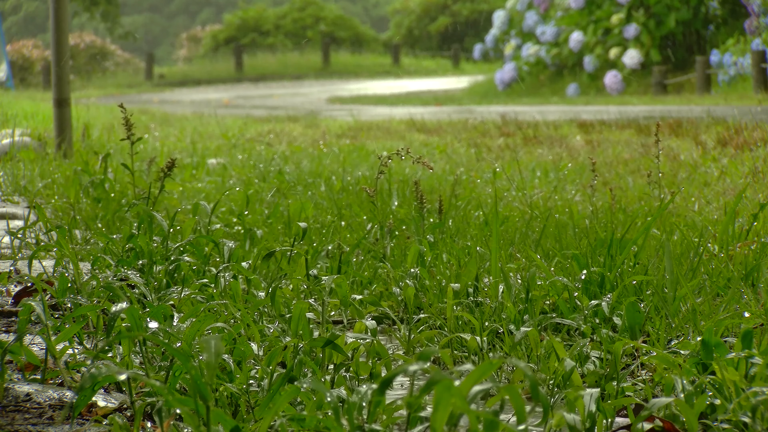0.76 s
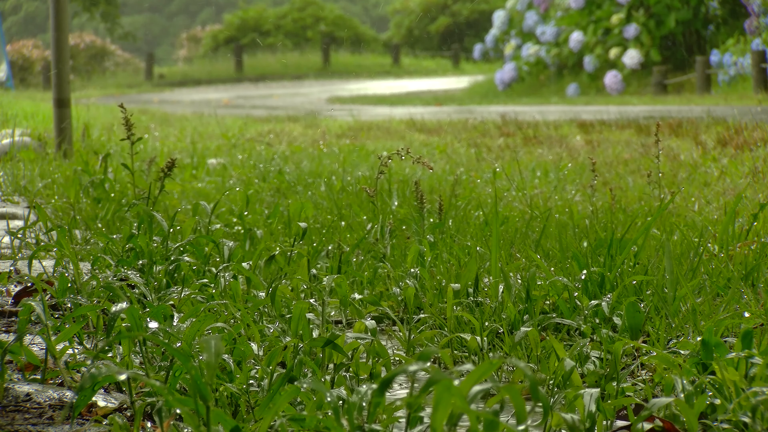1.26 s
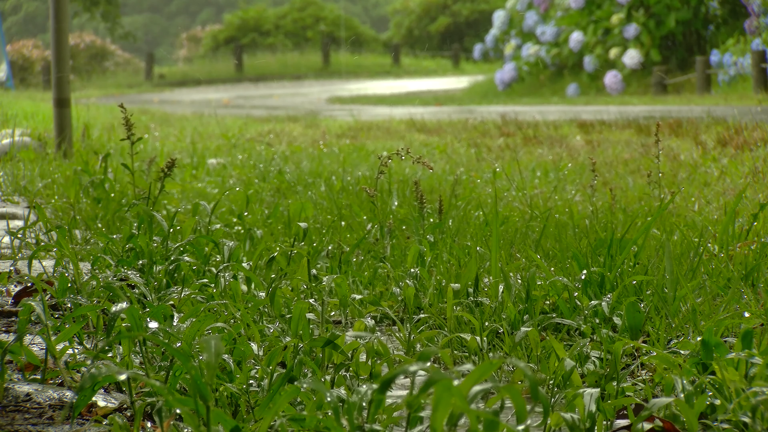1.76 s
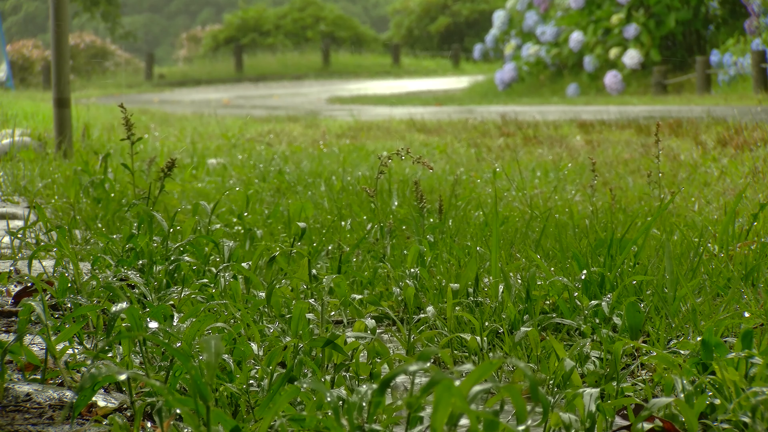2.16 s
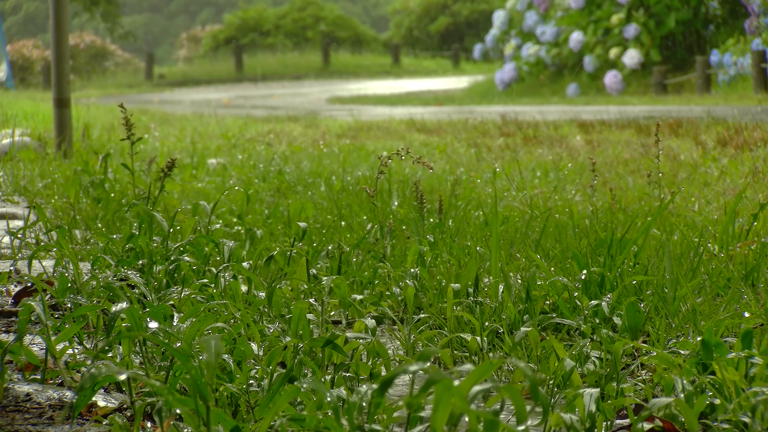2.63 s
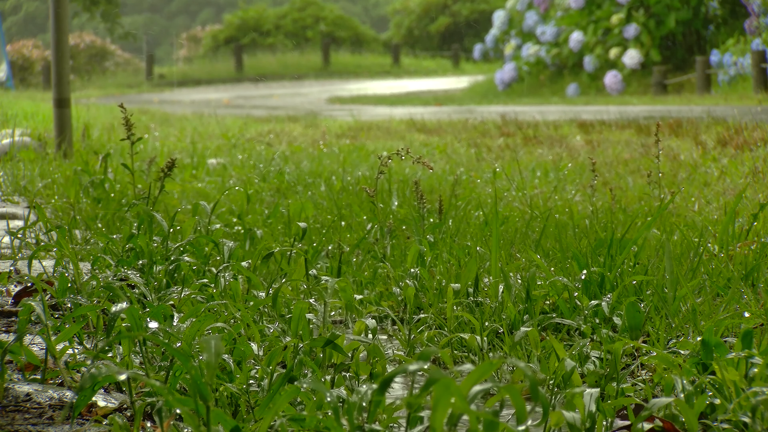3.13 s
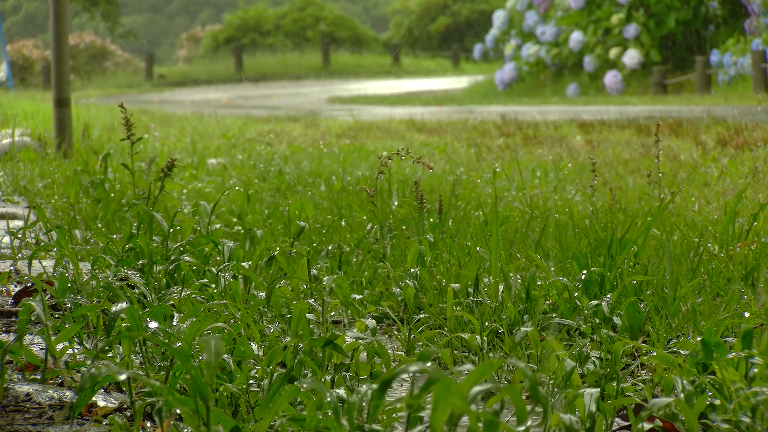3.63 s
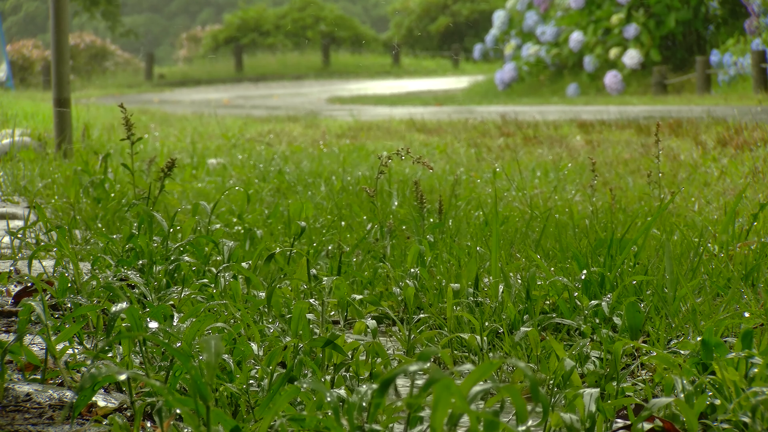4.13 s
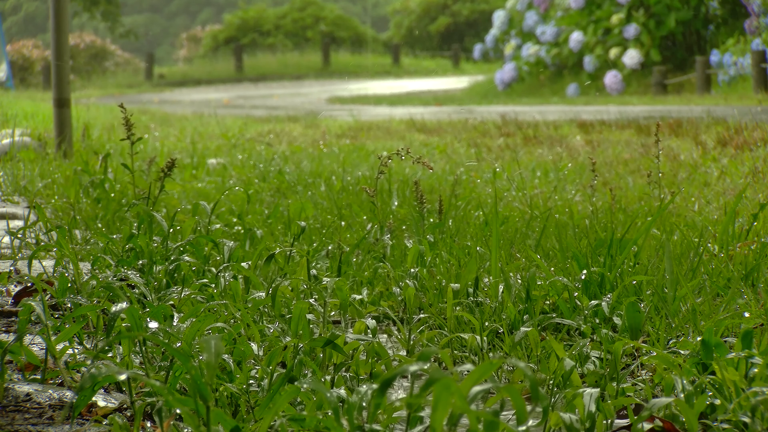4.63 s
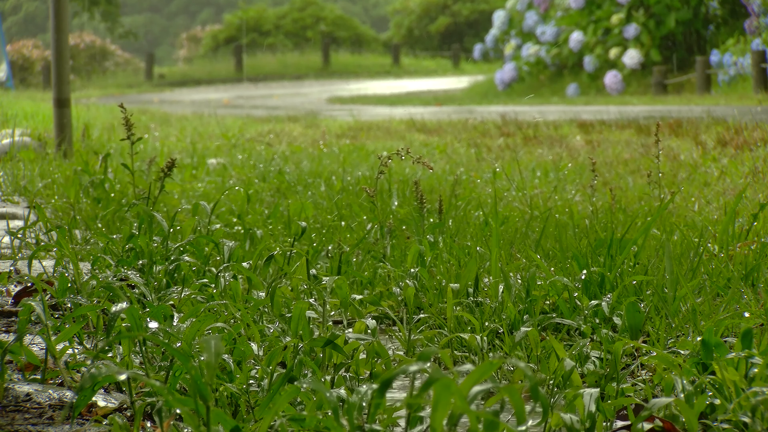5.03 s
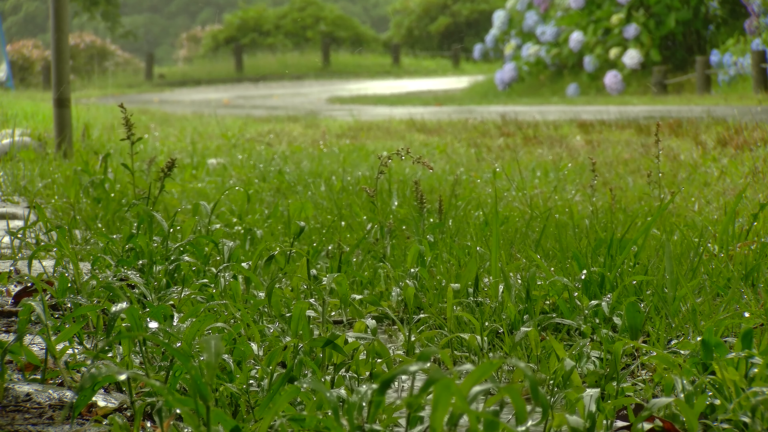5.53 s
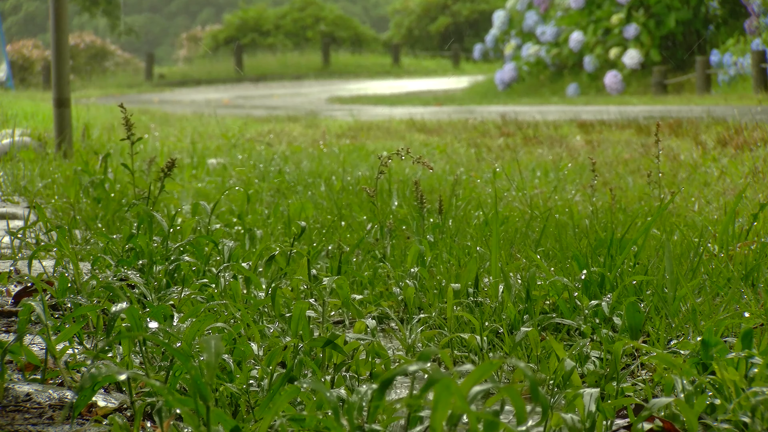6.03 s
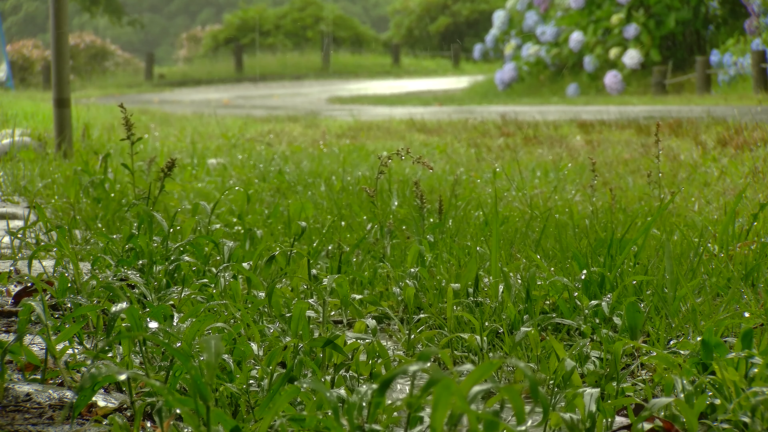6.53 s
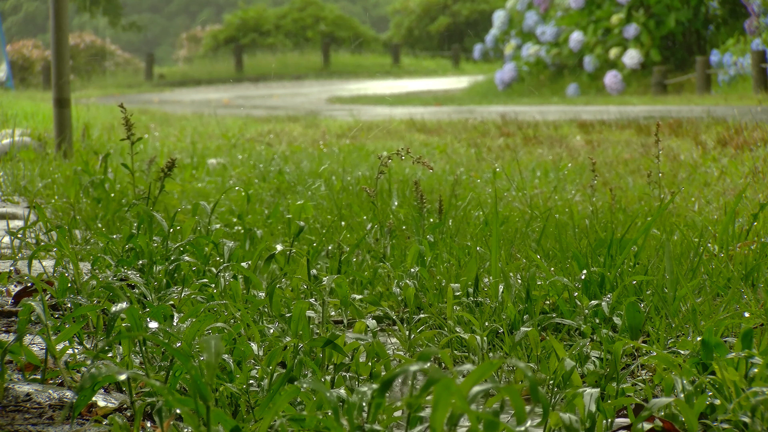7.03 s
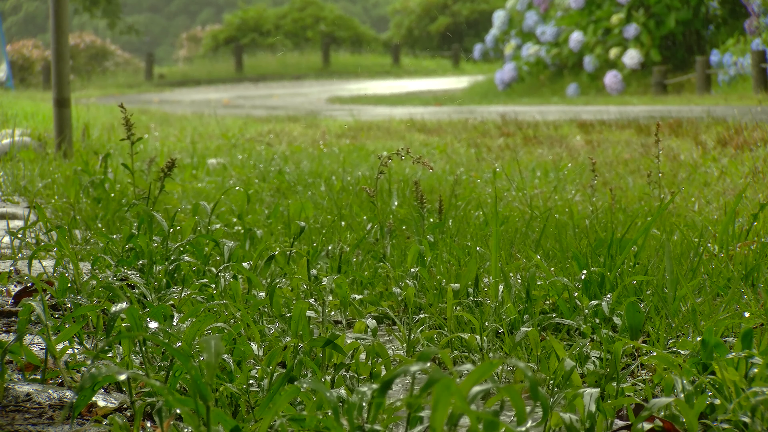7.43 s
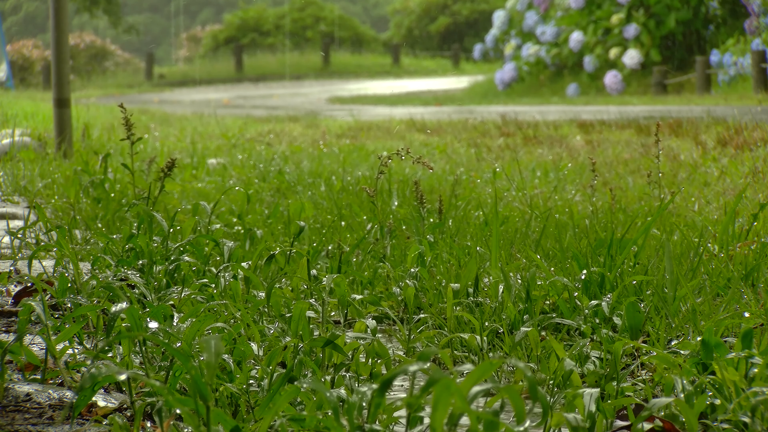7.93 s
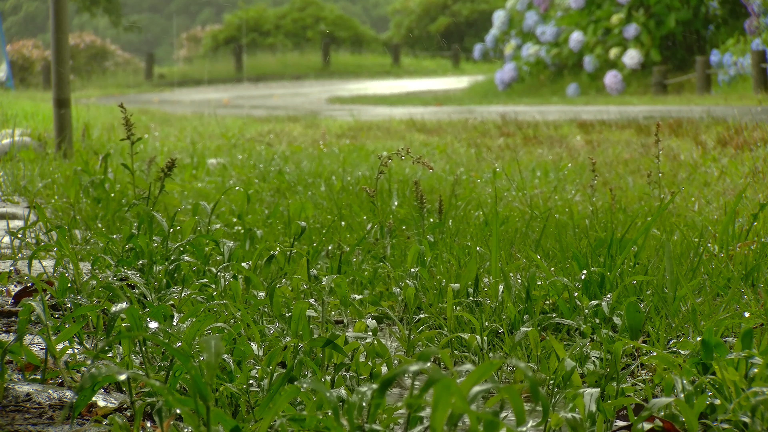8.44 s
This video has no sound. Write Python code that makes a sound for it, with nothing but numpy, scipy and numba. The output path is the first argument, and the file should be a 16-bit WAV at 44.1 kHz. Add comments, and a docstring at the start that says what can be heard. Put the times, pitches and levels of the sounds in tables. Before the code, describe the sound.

Steady rain falls on a lawn and a puddle for nearly nine seconds, heard through a stereo microphone close to the ground. From the start, distant drops blend into an even hiss with little bass, while nearer ones patter, tick and crackle on the wet grass. The closest drops land irregularly, several each second, as sharp little taps, very short bubbly plinks in the water, soft splats on leaves and bursts of fine, high spray. Stronger single drops stand out at about 0.15, 1.1 and 3 seconds, with more sharp ticks near 1.45, 4 and 5.6 seconds. A quick cluster of taps and leaf splats comes just after 6 seconds, followed near 6.9 seconds by a small bubble note that rises in pitch. The rain keeps the same strength throughout, with close drops still tapping at the end.

```python
"""Steady rain on a lawn and a puddle, close to a small stereo microphone near the ground.
From the start far drops merge into hiss and nearer ones patter, while the nearest ring as short
gliding bubbles, splat on leaves and burst into fine spray. Strong drops fall near 0.15, 1.1 and 3 s,
a cluster follows at 6.15 s, and a bubble rises in pitch at 6.9 s; the rain goes on to the end.
Throughout, the microphone housing rings at a few pitches and sets how alike its two ports hear."""
import sys
import numpy as np
from scipy import signal
from scipy.fft import rfft, irfft, next_fast_len
from scipy.io import wavfile
from scipy.ndimage import uniform_filter1d
from numba import njit

SR = 44100
rng = np.random.default_rng(int(sys.argv[2]) if len(sys.argv) > 2 else 0)


def master_out(mix):
    """Clip the mix to full scale and print it as 16-bit PCM to the path in sys.argv[1]."""
    frames = np.transpose(np.atleast_2d(mix))
    ceiling = np.clip(frames, -1, 1)
    pcm = np.round(ceiling * 32767).astype(np.int16)
    wavfile.write(sys.argv[1], SR, pcm)


N = 382788

# the nearest drops, in the puddle or on a leaf: t/s, peak level/dB, mid-glide f/Hz, T60/s, glide/octaves
RINGING_DROPS = [(0.0232, -39, 2220, 0.0073, -0.064), (0.1555, -24, 2910, 0.014, -0.08),
                 (0.155, -14, 3550, 0.013, -0.067), (0.1554, -9.5, 5500, 0.003, 0.1),
                 (0.2233, -34.5, 3400, 0.008, 0), (0.2923, -25, 2720, 0.017, -0.091),
                 (0.292, -28, 5970, 0.004, 0), (0.3706, -39.5, 2700, 0.025, -0.048),
                 (0.396, -36.5, 1490.0, 0.019, -0.3), (0.4489, -37, 1450, 0.014, -0.2),
                 (0.4687, -29, 2590, 0.02, -0.1), (0.5657, -25, 5800, 0.0077, 0.038),
                 (0.3944, -29, 5800, 0.003, 0), (0.598, -31, 3070, 0.003, -0.1),
                 (0.6047, -23, 1086, 0.0064, -0.5), (0.6062, -31.5, 750, 0.014, 0.15),
                 (0.605, -34, 4160, 0.003, 0), (0.6182, -34, 1880, 0.027, -0.17),
                 (0.618, -30.5, 5000, 0.0034, 0.5), (0.701, -39, 2400, 0.02, -0.18),
                 (0.748, -43, 1290, 0.012, -0.077), (0.7845, -30, 6000, 0.0055, 0.4),
                 (0.7893, -34.5, 2500, 0.022, -0.11), (0.823, -30.5, 6750, 0.0151, -0.13),
                 (0.8732, -35.5, 3030, 0.01, 0.045), (0.9008, -37, 1660, 0.0067, 0),
                 (0.943, -36.5, 1530, 0.029, -0.13), (0.962, -37.5, 1580, 0.05, -0.14),
                 (1.0605, -31, 1510, 0.029, -0.22), (1.1136, -17.5, 1870, 0.0059, 0.31),
                 (1.114, -41, 700, 0.0086, 0), (1.128, -40, 1530, 0.045, -0.029),
                 (1.182, -33.5, 5530, 0.015, -0.13), (1.1865, -26, 4150, 0.0045, 0.55),
                 (1.2328, -25.5, 1680, 0.0044, 0.3), (1.241, -44, 1300, 0.022, -0.075),
                 (1.2633, -26, 6370, 0.0087, -0.014), (1.3368, -34.5, 2550, 0.014, -0.049),
                 (1.425, -32, 6530.0, 0.0124, -0.07), (1.4392, -21, 2310, 0.0066, -0.11),
                 (1.439, -19, 5900, 0.0022, 0.1), (1.4505, -16.5, 6180, 0.0041, -0.026),
                 (1.4535, -28, 6700, 0.008, 0), (1.511, -32, 4300.0, 0.008, -0.3),
                 (1.523, -26, 2800, 0.0074, 0.4), (1.6083, -35, 2570, 0.006, -0.059),
                 (1.6982, -22, 6520, 0.0061, -0.27), (1.7157, -33.5, 1970, 0.0066, -0),
                 (1.769, -24, 6000, 0.0013, -0.15), (1.805, -32, 4460, 0.0029, 0.64),
                 (1.8074, -23.5, 2690, 0.027, -0.38), (1.8272, -34.0, 2640, 0.0137, 0.04),
                 (1.8295, -21.5, 4700.0, 0.0019, -0.079), (1.8428, -34.5, 2130, 0.023, -0.2),
                 (1.9153, -37, 1800, 0.01, 0), (1.92, -34, 2360, 0.0068, 0.02),
                 (1.952, -42.5, 1400, 0.05, -0.24), (1.962, -45, 1390, 0.022, -0.052),
                 (1.9716, -35, 3100, 0.0094, -0.1), (1.9732, -31, 3380, 0.0075, 0.2),
                 (2.0474, -36, 2900, 0.014, -0.16), (2.161, -29.5, 4970, 0.0046, 0.07),
                 (2.24, -38.5, 1980, 0.013, -0.085), (2.3263, -41.5, 1060, 0.053, -0.042),
                 (2.251, -34, 2800, 0.006, 0), (2.4646, -32, 2880, 0.003, 0.058),
                 (2.4804, -30.5, 5670, 0.003, 0), (2.585, -35.5, 6400.0, 0.015, -0.095),
                 (2.583, -39, 1670, 0.011, 0), (2.7007, -37, 2050.0, 0.008, 0.0),
                 (2.819, -32.5, 5730, 0.0095, -0.05), (2.807, -37, 3330, 0.006, 0),
                 (2.8735, -32, 4300, 0.003, 0.056), (2.8725, -32, 2860, 0.0052, -0.25),
                 (2.8941, -35, 2970, 0.013, 0.0), (2.9089, -24.5, 5920, 0.012, 0.016),
                 (2.9991, -35, 2630, 0.016, -0.067), (3.009, -31, 4660, 0.0072, 0.82),
                 (3.0352, -15, 2620, 0.0039, 0.27), (3.0356, -20.5, 3720, 0.0065, -0.029),
                 (3.035, -23.5, 6000, 0.0022, -0.14), (3.0375, -42.5, 950, 0.013, 0.12),
                 (3.07, -36, 2350, 0.006, 0), (3.11, -31, 5600, 0.006, -0.16),
                 (3.1743, -39.5, 1430, 0.042, -0.07), (3.1897, -32.5, 6300, 0.007, -0.28),
                 (3.4256, -33, 2780, 0.004, 0), (3.425, -32, 1600, 0.037, -0.29),
                 (3.4252, -28, 5040.0, 0.0031, 0.31), (3.452, -24.5, 5150, 0.0027, -0.012),
                 (3.4705, -29.5, 2060, 0.0125, 0.2), (3.4762, -37, 4660, 0.01, 0),
                 (3.6659, -31.5, 5630, 0.0148, -0.05), (3.669, -37, 3600.0, 0.012, 0.0),
                 (3.8057, -27, 5570, 0.007, -0.058), (3.796, -34, 6660, 0.006, 0.037),
                 (3.8223, -37.5, 1400, 0.0185, -0.1), (3.891, -38.5, 1370, 0.05, -0.11),
                 (3.9188, -26, 5600, 0.004, 0), (3.919, -28.5, 3870, 0.0091, 0.07),
                 (3.958, -17, 5500, 0.0019, 0.042), (3.974, -37, 4000, 0.012, 0),
                 (4.1665, -26, 5380, 0.01, -0.07), (4.1848, -24, 5650, 0.0057, 0.083),
                 (4.2036, -27, 3060, 0.011, -0.2), (4.203, -16, 5550, 0.0014, 0),
                 (4.3202, -37, 1970, 0.01, 0), (4.3636, -32.5, 3360, 0.006, 0.15),
                 (4.3646, -36, 5600, 0.006, -0.055), (4.4378, -36.5, 5370, 0.013, 0.24),
                 (4.4833, -34, 2600, 0.0049, -0.2), (4.4854, -37, 2120, 0.038, -0.13),
                 (4.5085, -30, 4970, 0.0024, 0.15), (4.54, -36, 4400, 0.0049, -0.36),
                 (4.55, -34, 2530, 0.018, -0.12), (4.5504, -23.5, 5100, 0.00095, 0.19),
                 (5.1313, -23.5, 5020, 0.0047, -0.036), (5.113, -41, 1410, 0.012, -0.072),
                 (5.166, -37.5, 1520, 0.043, -0.03), (5.24, -35, 3670, 0.0085, 0.0),
                 (5.274, -20.5, 5270, 0.0054, -0.34), (5.311, -28, 5740, 0.0022, -0.25),
                 (5.4614, -26, 5940, 0.004, 0.082), (5.5326, -19, 5050, 0.0076, 0.2),
                 (5.556, -39, 2860, 0.012, -0.11), (5.632, -30, 1770, 0.0088, -0.025),
                 (5.642, -22, 5150, 0.0028, 0.079), (5.7146, -36, 2520, 0.008, 0),
                 (5.8278, -32, 6230, 0.007, -0.16), (5.8704, -36, 3720, 0.01, 0.0),
                 (6.1218, -34, 2350, 0.0074, -0.14), (6.1482, -21, 6400.0, 0.0034, 0.21),
                 (6.1502, -13, 4560, 0.0018, 0.019), (6.1725, -36, 3870, 0.017, 0),
                 (6.185, -36.5, 1670, 0.018, -0.43), (6.217, -41, 1650, 0.02, 0),
                 (6.242, -36, 5700, 0.0103, 0.26), (6.244, -27.5, 6300, 0.0088, -0.065),
                 (6.315, -29.5, 1440, 0.0054, -0.021), (6.321, -47, 1390, 0.036, 0.11),
                 (6.3868, -32, 4500, 0.0062, 0.53), (6.3943, -33.5, 1300, 0.012, -0.5),
                 (6.467, -24, 6000, 0.0025, 0.082), (6.6848, -38, 2760, 0.0262, 0.22),
                 (6.7186, -32, 5730, 0.0047, -0.083), (6.7383, -28, 2600, 0.019, -0.16),
                 (6.8658, -35, 6560, 0.008, 0.11), (6.8846, -20, 2200, 0.033, 0.56),
                 (6.922, -46, 1180, 0.018, 0), (6.9555, -31, 5700, 0.004, -0.071),
                 (6.9615, -33, 1940, 0.024, -0.02), (7.0405, -45, 1180, 0.017, -0.031),
                 (7.0414, -33.5, 5070, 0.012, 0.02), (7.0543, -28, 2040, 0.03, -0.008),
                 (7.0753, -28, 5800, 0.0054, -0.3), (7.074, -39, 2010, 0.03, 0.015),
                 (7.247, -35, 1700, 0.003, 0), (7.247, -37, 2640.0, 0.0049, 0.68),
                 (7.247, -31.5, 3720, 0.01, -0.23), (7.332, -27.5, 6030, 0.0063, 0.033),
                 (7.4491, -39.5, 1550, 0.029, -0.1), (7.49, -36.5, 1200, 0.0102, -0.26),
                 (7.5363, -30, 3680, 0.003, 0.052), (7.5365, -24, 5400, 0.0031, -0.3),
                 (7.6968, -35.5, 5670, 0.008, -0.2), (7.8495, -36.5, 1510, 0.04, 0.052),
                 (7.887, -36.5, 1310, 0.012, 0.1), (7.895, -32.5, 5600, 0.013, 0.35),
                 (7.9287, -29.5, 6030, 0.024, 0.37), (7.967, -36, 2800, 0.006, -0.074),
                 (8.1176, -28, 1690, 0.0069, 0.21), (8.1464, -31.5, 2850.0, 0.0107, 0.0),
                 (8.1466, -31, 5040.0, 0.003, -0.23), (8.2206, -27, 5950, 0.0022, -0.051),
                 (8.2344, -35, 4970, 0.011, -0.06), (8.3928, -25, 5910.0, 0.0024, 0.21),
                 (8.4189, -42, 920, 0.018, -0.037), (8.517, -23.5, 6440, 0.0024, -0.25),
                 (8.543, -21, 5100, 0.0019, 0.2), (8.553, -35, 1640, 0.028, -0.36),
                 (8.658, -23.0, 5980, 0.0075, 0.14), (8.6607, -33, 1300, 0.0027, 0.61),
                 (8.6644, -31.5, 2070, 0.019, -0.053)]


def ringing_drops():
    """Damped resonance: an impact snaps, its bubble rings almost cleanly, and ripples follow."""
    t, db, hz, t60, glide = np.transpose(RINGING_DROPS)
    start_hz = hz * 2 ** (-glide / 2)
    bubble = peaked_grains(t, db, start_hz, t60, glide, rise_cycles=.41, rough=.015, rough_hz=500)
    ripple_db = np.minimum(db, -21) - 35 + 12 * np.log10(hz * t60)  # stronger after many cycles
    ripple = grains(t, ripple_db, hz, t60=.05, glide=0, rise_cycles=2.5, rough=.99, rough_hz=700)
    snap_hz = np.minimum(2 * hz, 7000)
    snap = peaked_grains(t, db - 20, snap_hz, t60=.0019, glide=0, rise_cycles=.6, rough=1, rough_hz=1300)
    return bubble + ripple + snap


# drops bursting into fine spray: t/s, spray peak level/dB, mist peak level/dB (both before the housing)
SPRAY_BURSTS = [(0.0095, -42, -56), (0.1226, -40, -58), (0.1271, -47, -50), (0.153, -41, -37),
                (0.189, -42, -56), (0.2918, -38, -42.0), (0.387, -37, -43.0), (0.4167, -40, -53.0),
                (0.4271, -38, -49), (0.5424, -41, -41), (0.5982, -39, -48), (0.6115, -37, -52),
                (0.6358, -37, -43), (0.6362, -34, -50), (0.785, -28.5, -43.0), (0.8235, -27.5, -33.0),
                (0.8813, -35, -54.0), (1.1108, -36, -25), (1.112, -27, -34), (1.22, -36, -52.0),
                (1.3208, -38, -60.0), (1.3399, -43, -49), (1.45, -36, -38), (1.528, -40, -41),
                (1.6971, -34, -49), (1.7566, -40, -56), (1.9382, -36, -55.0), (1.995, -40, -58),
                (2.1605, -37.5, -51), (2.445, -38.5, -54), (2.465, -45, -50), (2.4806, -44, -49),
                (2.8188, -45, -47), (2.8257, -28, -49.0), (2.909, -35, -52.0), (3.0332, -42, -49.0),
                (3.07, -35, -43), (3.0718, -34, -39), (3.109, -37, -51.0), (3.1845, -50, -45),
                (3.2665, -50, -46), (3.2872, -50, -47), (3.3394, -54, -47), (3.4254, -34.5, -45),
                (3.4528, -38, -45.0), (3.6203, -48, -49), (3.5622, -50, -49), (3.666, -28.5, -37),
                (3.675, -45, -55), (3.919, -33.5, -54.0), (3.9559, -42, -51.0), (4.1842, -41, -49.0),
                (4.203, -31, -37), (4.2393, -48, -48), (4.283, -36, -48.0), (4.55, -32, -42),
                (4.5537, -38, -47), (4.7109, -37, -56.0), (4.7665, -32, -34), (4.8138, -39, -43),
                (5.0451, -37, -36), (5.0872, -38, -48.0), (5.2744, -36, -39.0), (5.3109, -28.5, -35.0),
                (5.313, -25, -46), (5.46, -38, -49.0), (5.5326, -46, -50), (5.5732, -41, -40),
                (5.6427, -17.5, -44), (5.6623, -40, -56.0), (5.8699, -45, -47), (5.8993, -51, -44),
                (6.1243, -42, -46), (6.148, -19, -40), (6.1547, -39.0, -48.0), (6.1596, -46, -44),
                (6.1848, -32, -47.0), (6.1922, -38, -43), (6.2102, -34, -47.0), (6.2216, -37, -48),
                (6.241, -25.5, -49), (6.2454, -30, -47.0), (6.464, -39, -47), (6.5187, -39.5, -65),
                (6.718, -39, -56), (6.7265, -40, -58), (6.7395, -38, -48.0), (6.8907, -45, -38),
                (6.9566, -40, -49.0), (7.042, -40, -50), (7.0725, -33, -39), (7.537, -40, -49),
                (7.63, -42, -58.0), (7.735, -41, -52), (7.8934, -30.5, -47), (7.929, -31, -47.0),
                (8.0822, -37, -52.0), (8.111, -47, -46), (8.1465, -39, -45), (8.1684, -44, -49),
                (8.22, -33, -48), (8.2709, -39, -61), (8.325, -32.5, -50), (8.329, -33, -34),
                (8.392, -25, -44.0), (8.3996, -36, -43), (8.5175, -46, -64.0), (8.543, -40, -48.0),
                (8.6574, -24.5, -41)]


def sprays(t60=.0047):
    """Atomisation: a drop bursts in treble noise, with a softer fall of droplets as its tail."""
    t, db, mist_db = np.transpose(SPRAY_BURSTS)
    spray = peaked_grains(t, db, 9780, t60, glide=0, rise_cycles=2.8, rough=.89, rough_hz=1600)
    mist = peaked_grains(t, mist_db, 13040, t60, glide=0, rise_cycles=11, rough=.97, rough_hz=2200)
    fall_db = np.minimum(db, -27) - 15.5
    fall = grains(t, fall_db, 9300, t60=.079, glide=0, rise_cycles=5.7, rough=1, rough_hz=2310)
    return colour(spray + mist + fall, housing_db)


# drops breaking on a leaf: t/s, peak level/dB, centre f/Hz, T60/s
LEAF_SPLATS = [(0.1248, -36.5, 6000, .012), (0.6046, -27.5, 1886, 0.0089), (1.11, -36, 6000, .015),
               (1.219, -40, 5740, .015), (3.037, -42, 1770, 0.024), (3.07, -30.5, 5440, 0.0097),
               (4.7105, -40, 5700, .007), (6.006, -45, 6500, 0.045), (6.019, -36, 6750, .01),
               (6.064, -41, 5400, 0.0074), (6.186, -27.5, 5640, 0.015), (6.1912, -33, 5100, 0.036),
               (6.1897, -31, 3300, 0.01), (6.142, -38, 5140, 0.0088), (6.24, -33.5, 3560, 0.0068),
               (6.385, -36.5, 2860, 0.015), (7.054, -38.5, 6500, 0.022), (7.322, -44, 6560, .015)]


def leaf_splats(rise_s=.0023):
    """Impact noise: a drop breaks on a leaf in a soft-edged band of noise with no clear note."""
    t, db, hz, t60 = np.transpose(LEAF_SPLATS)
    return peaked_grains(t, db, hz, t60, glide=0, rise_cycles=hz * rise_s, rough=.99, rough_hz=840)


def rain(shower_db=-46.5, crackle_db=-57.5):
    """Incoherent addition: far drops merge into hiss; nearer ones patter, tick on grass and crackle."""
    near = undb(-12) * patter(count=9000, low_hz=912.3, octaves=3.016, top_db=15, spread_db=3.5,
                              cycles=30, rise_cycles=1.56, rough=.52, rough_hz=1490)
    bubbles = undb(-10) * patter(count=900, low_hz=895, octaves=3.1, top_db=17, spread_db=1,
                                 cycles=119, rise_cycles=2.8, rough=.08, rough_hz=710)
    ticks = undb(-10.5) * patter(count=6000, low_hz=4193, octaves=1.67, top_db=15, spread_db=12,
                                 cycles=36, rise_cycles=3.8, rough=.22, rough_hz=1200)
    crackle = patter(count=4200, low_hz=6500, octaves=1, top_db=12, spread_db=6,
                     cycles=45, rise_cycles=8, rough=1, rough_hz=4500)  # droplets on leaves close by
    crackle = signal.sosfilt(signal.butter(3, 4500, "high", fs=SR, output="sos"), crackle)
    # distance dulls the hiss
    hiss = colour(rng.standard_normal((2, N)), lambda hz: -4 / (1 + (7500 / np.maximum(hz, 1)) ** 8))
    swell = undb(crackle_db) * flicker(rate_hz=10, depth_db=3)
    return wet_grass(hiss + near + ticks + bubbles) * undb(shower_db) + wet_grass(crackle) * swell


def patter(count, low_hz, octaves, top_db, spread_db, cycles, rise_cycles, rough, rough_hz):
    """Shot noise: drops fall at random times, many faint and few strong, capped at top_db."""
    when, pitch, size, length = rng.random((count, 4)).T
    hz = low_hz * 2 ** (octaves * pitch)
    db = np.minimum(-spread_db * np.log(size), top_db)
    t60 = cycles * (.5 + length) / hz
    glide = .3085 * (2 * length - 1)  # rings of many cycles rise, those of few fall
    return grains(when * N / SR, db, hz, t60, glide, rise_cycles, rough, rough_hz)


# spectral envelope of rain on wet grass: f/Hz, relative level/dB
GRASS_SPECTRUM = [(15, -50), (30, -27), (60, -15), (560, -5.5), (1100, -8), (1400, 3), (2300, -2.5),
                  (4250, -6), (6500, -1), (7200, -9.5), (8400, -10), (10100, -8), (13000, -14),
                  (15500, -19), (16200, -64)]


def wet_grass(x):
    """Filters in cascade: the colours of wet grass and housing add in decibels; output at unit RMS."""
    x = colour(x, lambda hz: on_log_hz(GRASS_SPECTRUM, hz) + housing_db(hz))
    return x / np.std(x)


# resonances of the microphone housing: f/Hz, bandwidth/Hz, gain/dB
HOUSING_RESONANCES = [(800, 380, 3), (1450, 580, -6.5), (2577, 190, 4.5), (3496, 850, 5), (5030, 1240, 2),
                      (6650, 200, 4), (7670, 190, 8.5), (8560, 450, -1), (9700, 320, 2)]


def housing_db(hz):
    """Resonance: the housing adds bell-shaped peaks and dips to the spectrum."""
    return sum(db / (1 + (2 * (hz - f) / width) ** 2) for f, width, db in HOUSING_RESONANCES)


# how alike the ports hear, negative where the housing shades them: f/Hz, correlation
PORT_CORRELATION = [(30, 0.8), (60, 0.5), (130, 0.21), (600, 0.79), (1300, 0.97), (3000, 0.71),
                    (4050, 0.47), (5000, 0.85), (6600, 0.82), (7200, -0.046), (8000, -0.12), (9000, -0.071),
                    (9900, 0.98), (11000, -0.4), (13000, -0.59), (14500, -0.39)]
# balance of the ports: f/Hz, left minus right level/dB
PORT_BALANCE = [(60, 1), (110, -0.5), (200, 0.5), (380, 2), (700, 2), (1290, 4), (2380, 3), (4400, 3),
                (8120, -1.5), (10000, 1), (15000, 2)]


def ports(modes):
    """Sum and difference: in-phase and opposed modes, weighted by correlation, give left and right."""
    size = next_fast_len(N)
    hz = np.fft.rfftfreq(size, 1 / SR)
    alike = np.clip(on_log_hz(PORT_CORRELATION, hz), -.99, .99)
    lean_db = on_log_hz(PORT_BALANCE, hz)
    same, opposed = rfft(modes, size) * np.sqrt(np.array([1 + alike, 1 - alike]) / 2)
    stereo = np.array([same + opposed, same - opposed]) * undb(np.array([lean_db, -lean_db]) / 2)
    return irfft(stereo, size)[:, :N]


def peaked_grains(t, db, hz, t60, glide, rise_cycles, rough, rough_hz):
    """An envelope peaks where growth balances decay; these grains are scaled to put that peak at db."""
    ratio = np.log(1000) * rise_cycles / (np.maximum(t60, .001) * hz)  # rise time over decay time
    unrisen = ratio / (ratio + 2)
    crest_db = 20 * np.log10(unrisen ** ratio * (1 - unrisen) ** 2)
    return grains(t, db - crest_db, hz, t60, glide, rise_cycles, rough, rough_hz)


def grains(t, db, hz, t60, glide, rise_cycles, rough, rough_hz):
    """Noise modulation: the share `rough` of each ring's power spreads about rough_hz to either side."""
    noise = rng.standard_normal((2, N)) + 1j * rng.standard_normal((2, N))
    noise = signal.lfilter(*signal.butter(2, rough_hz, fs=SR), noise)
    shake = np.sqrt(1 - rough) + np.sqrt(rough) * noise / np.std(noise)
    side, scatter = rng.random((len(t), 2)).T
    mode_phase = np.pi * (np.round(side) + scatter / 2 + 1 / 4)  # near a quarter turn: just off centre
    hz, t60, glide = (v + np.zeros_like(t) for v in (hz, np.maximum(t60, .001), glide))
    lowest_hz = hz * 2 ** np.minimum(glide, 0)
    cutoff_hz = np.clip(.8 * lowest_hz - rough * rough_hz, 100, SR / 3)
    rise = np.exp(-hz / (rise_cycles * SR))
    return ring((t * SR).astype(np.int64), hz, t60, glide, rise, undb(db), mode_phase, cutoff_hz, shake)


@njit
def ring(start, hz, t60, glide, rise, amplitude, mode_phase, cutoff_hz, shake):
    """Damped oscillators swell, glide and die away; one row per port mode (in phase, opposed)."""
    settle_s, damping = .003, 1.1  # a bubble stops gliding as it reaches the surface; high-pass damping
    settle = np.exp(-1 / (settle_s * SR))
    out = np.zeros((2, N))
    for k in range(len(start)):
        g = np.tan(np.pi * cutoff_hz[k] / SR)
        decay = np.exp(-np.log(1000) / (t60[k] * SR))
        for mode in range(2):
            envelope, unrisen, unsettled = amplitude[k], 1., 1.
            phase, state = mode * mode_phase[k], np.zeros(6)
            for i in range(start[k], min(start[k] + int(t60[k] * SR) + 60, N)):
                envelope, unrisen, unsettled = envelope * decay, unrisen * rise[k], unsettled * settle
                phase += 2 * np.pi * hz[k] / SR * 2 ** (glide[k] * (1 - unsettled))
                x = envelope * (1 - unrisen) ** 2 * (shake[mode, i] * np.exp(1j * phase)).imag
                for j in (0, 2, 4):  # three state-variable high-passes take the bass
                    band_state, low_state = state[j], state[j + 1]
                    band = (band_state + g * (x - low_state)) / (1 + g * (g + damping))
                    state[j], state[j + 1] = 2 * band - band_state, low_state + 2 * g * band
                    x -= damping * band + low_state + g * band
                out[mode, i] += x
    return out


def flicker(rate_hz, depth_db):
    """Amplitude modulation: a gain that ramps between random levels."""
    hold = int(SR / rate_hz)
    steps = np.repeat(rng.standard_normal(N // hold + 1), hold)[:N]
    return undb(depth_db * uniform_filter1d(steps, hold))


def colour(x, db_of, size=4096):
    """Minimum-phase filtering: the folded cepstrum gives a causal response with the gain db_of(f)."""
    cepstrum = irfft(np.log(undb(db_of(np.fft.rfftfreq(size, 1 / SR)))))
    cepstrum[1:size // 2] *= 2
    cepstrum[size // 2 + 1:] = 0
    impulse = irfft(np.exp(rfft(cepstrum)))[None, :size // 2]
    return signal.fftconvolve(x, impulse, axes=-1)[:, :N]


def on_log_hz(table, hz):
    """Interpolation of an (f/Hz, value) table on a logarithmic frequency axis."""
    f, value = np.transpose(table)
    return np.interp(np.log(np.maximum(hz, 1)), np.log(f), value)


def undb(db):
    """Level in decibels to amplitude ratio."""
    return 10 ** (np.asarray(db) / 20)


def scene():
    """Superposition: rain all round, and the nearest drops, which reach both ports more alike."""
    close = np.array([[1], [.48]])  # gains of the in-phase and opposed modes
    return ports(rain() + close * (ringing_drops() + leaf_splats() + sprays()))


def record(dry, top_hz=16500):
    """Band limiting: the microphone falls off at the very top and the recorder cuts above top_hz."""
    dull = colour(dry, lambda hz: -13 / (1 + (15850 / np.maximum(hz, 1)) ** 200))
    return signal.sosfilt(signal.ellip(10, .2, 70, top_hz, fs=SR, output="sos"), dull)


dry = scene()
out = record(dry)
master_out(out)
```